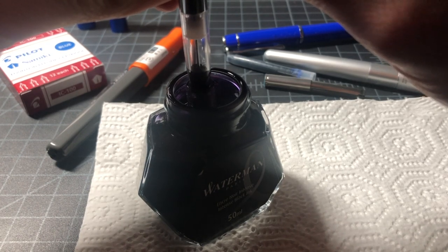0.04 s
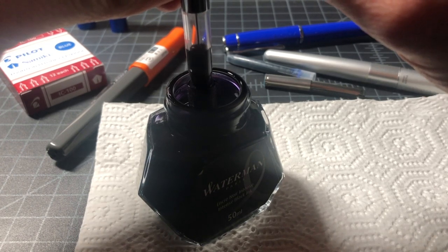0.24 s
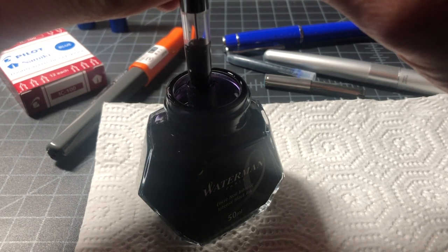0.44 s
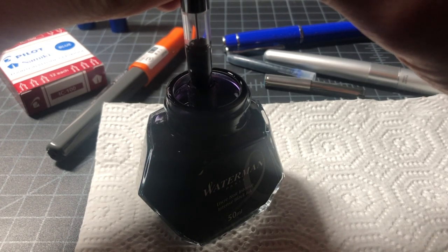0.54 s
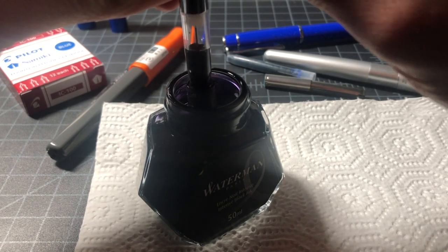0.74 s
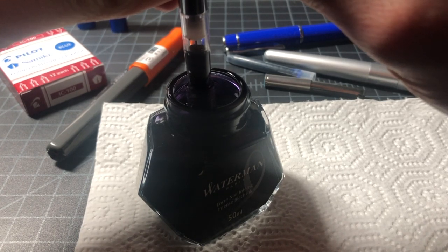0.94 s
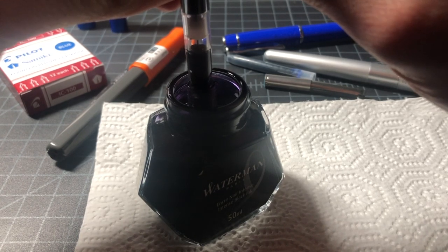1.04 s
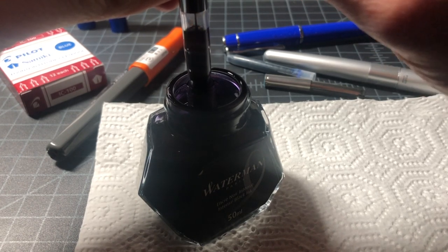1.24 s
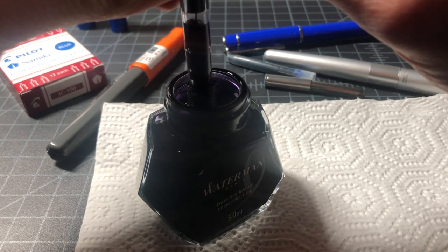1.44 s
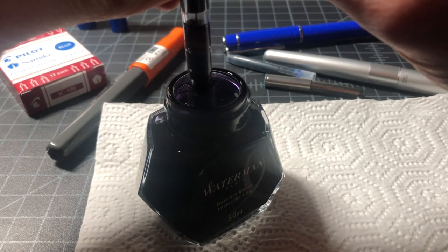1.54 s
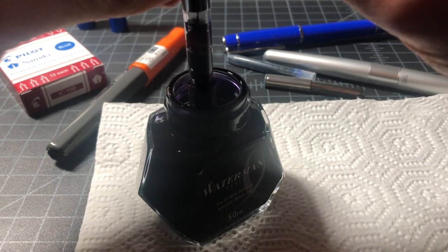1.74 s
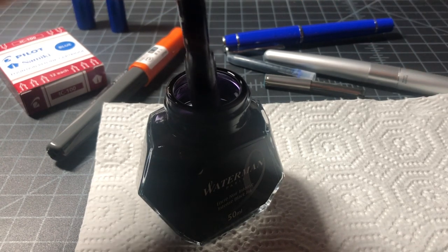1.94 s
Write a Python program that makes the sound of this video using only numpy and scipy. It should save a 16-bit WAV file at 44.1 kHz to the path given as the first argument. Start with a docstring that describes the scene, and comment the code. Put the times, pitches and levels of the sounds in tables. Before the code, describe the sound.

Small plastic plunger clicks at a pen filler: crisp snap, dull wet tap, second crisp snap

```python
"""In a small, humming room, a pen's ink-converter plunger is worked over a bottle on a desk.
The rod scrapes along its tube in stick-slip grains and snaps against its stop, ringing the barrel's modes.
Pushed down, it lands softly with a dull tap and a small squelch of ink, shaped from noise.
Tiny bubbles tick as very high decaying pings; faint low bumps of handling are damped sines.
Diffuse echoes follow the pen, over hum that wanders in pitch and a low rush of air."""
import sys
import numpy as np
from scipy import signal
from scipy.fft import rfft, irfft
from scipy.io import wavfile
from scipy.ndimage import uniform_filter1d

SR = 44100
rng = np.random.default_rng(int(sys.argv[2]) if len(sys.argv) > 2 else 0)


def inscribe(sig):
    """Save sig as 16-bit PCM at rate SR to the path in sys.argv[1].

    A 1-D sig is mono; a 2-D sig holds one channel per row.
    Samples are clipped to [-1, 1] before scaling.
    """
    pcm = np.round(np.clip(np.atleast_2d(sig).T, -1, 1) * 32767)
    wavfile.write(sys.argv[1], SR, pcm.astype(np.int16))


N = 88200

# resonant modes of the plastic barrel:
# free f/Hz, level/dB relative to the blow, t60/s, build-up/s, f/Hz at full grip
BARREL_MODES = [(1512, -34, 0.016, 0.00056, 1513), (2073, -4, 0.014, 0.0027, 2041),
                (3257, -37.5, 0.017, .0005, 2700), (5640, -31.5, 0.013, 0.00023, 6000),
                (7103, -28, 0.025, 0.0011, 7256), (8540, -36.5, 0.0087, 0.00015, 6900),
                (9010, -33, .013, 0.00028, 9080), (10400, -36.5, 0.018, 0.00017, 10450),
                (11600, -33.5, 0.0092, 0.00013, 11370), (12880, -36, .01, 0.00041, 12290),
                (14100, -30.5, 0.015, .0008, 13930), (14815, -21.5, 0.0092, .001, 14650)]


def undb(db):
    """Level to amplitude ratio: 20 dB is a factor of ten."""
    return 10 ** (np.asarray(db) / 20)


def unit(x):
    """Normalise the root-mean-square amplitude to 1."""
    return x / np.sqrt(np.mean(x ** 2) + 1e-20)


def since(start):
    """Elapsed time in seconds from an onset, zero before it."""
    return np.maximum(np.arange(N) / SR - start, 0)


def decay(t, t60):
    """Exponential damping: the level falls 60 dB in t60."""
    return np.exp(-np.log(1000) * t / t60)


def burst(t, rise, t60):
    """Energy builds up smoothly, then is lost to exponential damping."""
    return (1 - np.exp(-(t / rise) ** 2)) * decay(t, t60)


def colour(x, points):
    """Spectral shaping: weight by (f/Hz, level/dB) points on a log-frequency axis, at rms 1."""
    hz, db = np.array(points).T
    f = np.maximum(np.fft.rfftfreq(N, 1 / SR), 1)
    gain = undb(np.interp(np.log(f), np.log(hz), db))
    return unit(irfft(rfft(x) * gain, N))


def noise(points):
    """Gaussian noise with a shaped spectrum, at rms 1."""
    return colour(rng.standard_normal(N), points)


def convolve(x, response):
    """Linear superposition: every input sample starts its own copy of the response."""
    return signal.fftconvolve(x, response)[:N]


def walk(rate):
    """Slow random drift: random steps at a given rate in Hz, smoothed, at rms 1."""
    step = int(SR / rate)
    held = np.repeat(rng.standard_normal(200), step)[:N]
    return unit(uniform_filter1d(held, step))


def strike(modes, start, grip=0, dull_hz=SR):
    """Modal superposition: one blow rings damped modes; softness spares the high ones, grip retunes."""
    t, out = since(start), np.zeros(N)
    live = (t > 0) & (t < 0.1)
    for k, (free_hz, db, t60, rise, gripped_hz) in enumerate(modes):
        hz = free_hz + (gripped_hz - free_hz) * grip
        softness = np.hypot(1, (hz / dull_hz) ** 2)
        gain = (-1) ** k * undb(db) / softness  # neighbours swing in opposite phase
        out[live] += gain * burst(t[live], rise, t60) * np.sin(2 * np.pi * hz * t[live])
    return out


def snaps():
    """Hard impact: broadband crack, short ring of barrel and stop, trailing hiss, thin spring after-ring."""
    # plunger against its stop: t/s, level/dB, grip of the fingers (0-1), spring after-ring level/dB
    snap_events = [(.2375, 1.5, 0.2, -91), (1.3035, -0.5, 0.96, -72.5)]
    # end-stop modes, rung only by a hard snap: columns as for the barrel
    stop_modes = [(720, -33.5, 0.0083, 0.0008, 820), (3650, -14, 0.0077, .0007, 3680),
                  (4090, -20.5, .008, 0.00035, 4100), (6450, -28.5, 0.0039, 0.00015, 7600)]
    # spectrum of the crack: f/Hz, level/dB
    crack_spectrum = [(60, -35), (150, -13), (260, 0.5), (800, -8.5), (1200, -5), (2000, -5), (2750, -12),
                      (3500, -2.5), (4400, 0), (5200, -8), (6500, 2), (10000, -3.5), (15500, -2),
                      (16500, -7)]
    # spectrum of the trailing hiss: f/Hz, level/dB
    trail_spectrum = [(500, -13), (1600, -2.5), (2300, 6.5), (2800, -8), (3800, 2), (5000, -1.5),
                      (6500, 0.5), (10000, -2.5), (14500, -2), (15700, -3), (16300, -20.5)]
    spring_hz, spring_t60_s = 2930, 1.1
    out = 0
    for start, db, grip, spring_db in snap_events:
        t = since(start)
        crack = undb(-22.5) * noise(crack_spectrum) * burst(t, rise=0.000067, t60=0.0094)
        trail = undb(-49.5) * noise(trail_spectrum) * burst(t, rise=0.0014, t60=0.14)
        ring = strike(BARREL_MODES, start, grip) + strike(stop_modes, start, grip)
        spring = undb(spring_db) * decay(t, spring_t60_s) * np.sin(2 * np.pi * spring_hz * t)
        out = out + undb(db) * (ring + crack + trail) + spring
    return out


def knocks():
    """Cushioned impact: a long contact taps dully and excites mostly the barrel's lowest modes."""
    # soft contacts of the plunger: t/s, ring level/dB, f/Hz above which it is dull, tap level/dB
    contacts = [(.2062, -22.5, 4970, -47.5), (.6075, -39.5, 2500, -79), (.7835, -38, 2500, -61),
                (.7960, -32.5, 3000, -75), (.8186, -16.5, 2970, -55), (.8212, -7, 2260, -58),
                (.8255, -18.5, 2000, -65), (.8460, -22.5, 1805, -58), (.9250, -49, 3000, -63.5),
                (1.265, -42, 5040, -51.5)]
    # spectrum of the tap: f/Hz, level/dB
    tap_spectrum = [(500, -7), (1500, -6.5), (2900, 0), (3400, -6), (4200, -9), (5800, -13.5),
                    (8000, -23.5), (16000, -32)]
    tap_noise, out = noise(tap_spectrum), 0
    for start, db, dull_hz, tap_db in contacts:
        ring = undb(db) * strike(BARREL_MODES, start, dull_hz=dull_hz)
        tap = undb(tap_db) * tap_noise * burst(since(start), rise=0.0006, t60=0.022)
        out = out + ring + tap
    return out


def scrapes():
    """Stick-slip friction: dense random grains hiss, ring the barrel and wake a faint squeak."""
    # slides of the rod: peak t/s, swell/s, fade/s, hiss level/dB, barrel ring level/dB,
    # squeak level/dB, squeak f/Hz
    slides = [(.1555, 0.0067, .006, -51, -48.5, -62, 5730), (0.166, 0.0028, 0.0097, -50, -44, -59, 6520),
              (.222, .02, 0.025, -66.5, -65, -83, 3370), (.780, 0.02, 0.036, -74.5, -72, -86, 4370),
              (.822, 0.006, 0.011, -55.5, -47, -58, 7460), (1.2018, 0.00094, 0.0074, -56, -60, -71.5, 2280),
              (1.2136, 0.0072, 0.009, -46, -51.5, -57, 3100),
              (1.229, 0.0039, .005, -64, -57.5, -52.5, 2250), (1.267, 0.0029, 0.018, -63, -66, -69.5, 3034)]
    # spectrum of the hiss: f/Hz, level/dB
    hiss_spectrum = [(500, -2), (1500, -12), (2200, -1), (4000, -8), (5800, -2), (7500, -4), (10000, 2),
                     (12000, -2.5), (14000, 3.5), (15500, 3), (16500, -36)]
    grains_per_s, squeak_t60_s = 3000, 0.038
    t, out = since(0), 0
    grains = unit(rng.standard_normal(N) * (rng.random(N) < grains_per_s / SR))
    hiss = colour(grains, hiss_spectrum)
    ring = unit(convolve(grains, strike(BARREL_MODES, 0, dull_hz=3500)))
    for peak, swell, fade, hiss_db, ring_db, squeak_db, squeak_hz in slides:
        resonance = decay(t, squeak_t60_s) * np.sin(2 * np.pi * squeak_hz * t)
        squeak = unit(convolve(grains, resonance))
        envelope = np.exp(-np.maximum((peak - t) / swell, (t - peak) / fade))
        out = out + envelope * (undb(hiss_db) * hiss + undb(ring_db) * ring + undb(squeak_db) * squeak)
    return out


def ink():
    """Forced flow: ink squeezed through the feed gives short wet squelches of shaped noise."""
    # squelches: t/s, level/dB, t60/s
    squelches = [(0.824, -39.5, 0.048), (0.842, -49.5, 0.11)]
    # spectrum of the squelch: f/Hz, level/dB
    ink_spectrum = [(250, -20), (500, 0), (800, 8.5), (1050, -2.5), (1250, -19), (1510, 0), (1700, 3),
                    (2800, -9.5), (4000, -25.5)]
    out = 0
    for start, db, t60 in squelches:
        out = out + undb(db) * noise(ink_spectrum) * burst(since(start), rise=0.0015, t60=t60)
    return out


def bubbles():
    """Damped free oscillation: each tiny bubble bursts with a very high ping and a splash."""
    # bursting bubbles: t/s, level/dB, pitch f/Hz
    ticks = [(0.411, -51.5, 11800), (0.498, -69, 13160), (.6343, -59, 12000), (.8895, -71, 13100),
             (0.9257, -58.5, 10400), (1.3900, -61, 13700), (1.488, -67, 12100), (1.6092, -58.5, 12080),
             (1.6280, -65.5, 12400), (1.6550, -64.5, 13500), (1.6733, -69.5, 13600), (1.711, -63.5, 13000),
             (1.778, -66.5, 13700), (1.9360, -60, 11760), (1.972, -56.5, 11850)]
    # spectrum of the splash: f/Hz, level/dB
    splash_spectrum = [(2000, -42), (4500, -37), (6500, -12), (8000, 8), (11000, 2), (14000, 8),
                       (16000, -9)]
    t60_s = 0.0063
    splash, out = undb(-1) * noise(splash_spectrum), np.zeros(N)
    for start, db, hz in ticks:
        t = since(start)
        live = (t > 0) & (t < 2 * t60_s)
        ping = np.sin(2 * np.pi * hz * t[live])
        out[live] += undb(db) * decay(t[live], t60_s) * (ping + splash[live])
    return out


def bumps():
    """Low-frequency damped oscillation: faint dull thuds of handling."""
    # thuds: t/s, level/dB, pitch f/Hz
    thuds = [(.075, -54, 171.7), (1.536, -42, 206)]
    out = 0
    for start, db, hz in thuds:
        t = since(start)
        out = out + undb(db) * burst(t, rise=0.004, t60=0.049) * np.sin(2 * np.pi * hz * t)
    return out


def room(x):
    """Diffuse reverberation: a random echo tail whose bands decay separately, the treble fastest."""
    # reverberation bands: f/Hz, t60/s, level/dB relative to the other bands
    bands = [(300, 0.44, -2.5), (2000, 0.35, 1), (4240, 0.39, -7), (7160, 0.27, -4), (15000, 0.18, -8)]
    first_echo_s, room_db = 0.0077, -24
    t, f = since(first_echo_s), np.fft.rfftfreq(N, 1 / SR)
    hz, t60, db = np.array(bands).T
    echoes, tail = rfft(rng.standard_normal(N)), 0
    for share, life, gain in zip(np.eye(len(hz)), t60, undb(db)):
        band = irfft(echoes * np.interp(f, hz, share), N)  # overlapping triangular bands
        tail = tail + gain * band * decay(t, life) * (t > 0)
    return convolve(x, undb(room_db) * tail / np.linalg.norm(tail))


def background():
    """Frequency modulation: hum of mains and fan drifts in pitch, over air noise strongest in the bass."""
    # hum partials: f/Hz, rms level/dB, rms wander/Hz
    hum = [(57.7, -63, 1.7), (119.3, -65, 2), (229.6, -65, 6.3), (347.8, -68.5, 6)]
    # spectrum of the room air: f/Hz, level/dB per Hz
    air_spectrum = [(20, -39), (40, -12), (80, 1), (100, -10), (135, 4.5), (175, -4), (250, 6), (320, -1.5),
                    (550, -3.5), (750, -8.5), (1100, -17.5), (2000, -25), (4000, -34.5), (8000, -38.5),
                    (15300, -39), (16300, -88)]
    out = undb(-58) * noise(air_spectrum)
    for hz, db, wander in hum:
        drifting_hz = hz + wander * walk(rate=14)
        phase = 2 * np.pi * (np.cumsum(drifting_hz) / SR + rng.random())
        out = out + undb(db) * unit(np.sin(phase))
    return out


def scene():
    """Superposition: direct sound of the pen, its reverberation and the background."""
    pen = snaps() + knocks() + scrapes() + ink() + bubbles() + bumps()
    return (pen + room(pen) + background())[None]


def record(dry):
    """Band limitation: a steep elliptic low-pass removes the extreme treble."""
    top_hz = 16400
    low_pass = signal.ellip(8, 0.2, 70, top_hz, fs=SR, output="sos")  # order, ripple dB, stopband dB
    return signal.sosfilt(low_pass, dry)


dry = scene()
out = record(dry)
inscribe(out)
```